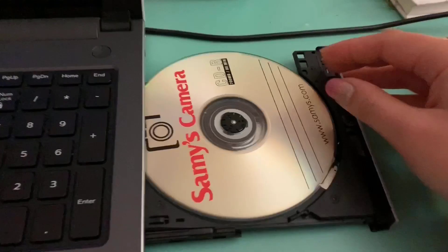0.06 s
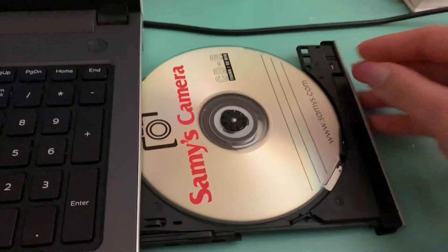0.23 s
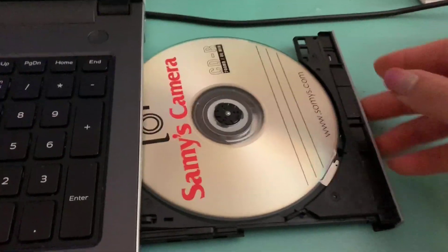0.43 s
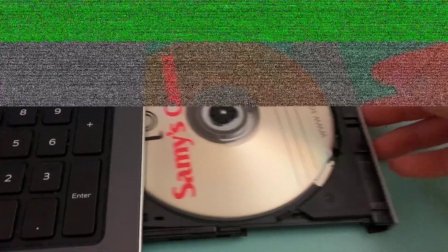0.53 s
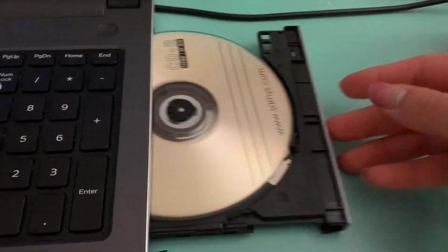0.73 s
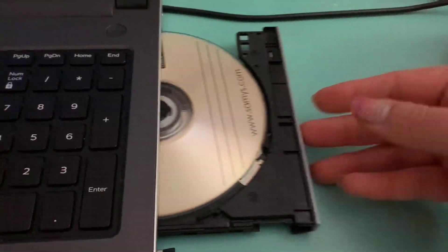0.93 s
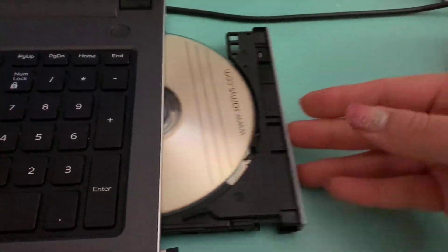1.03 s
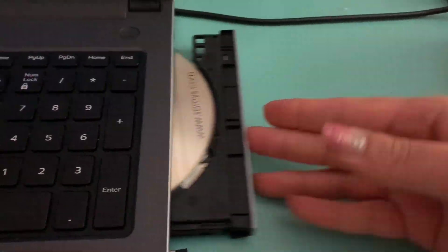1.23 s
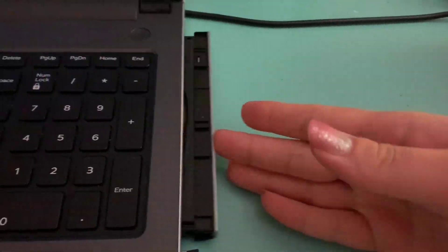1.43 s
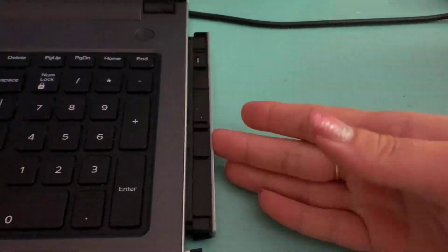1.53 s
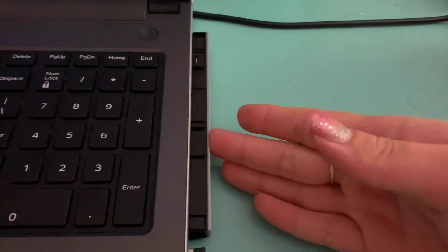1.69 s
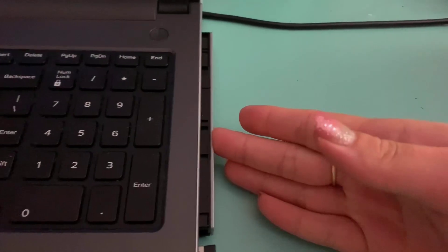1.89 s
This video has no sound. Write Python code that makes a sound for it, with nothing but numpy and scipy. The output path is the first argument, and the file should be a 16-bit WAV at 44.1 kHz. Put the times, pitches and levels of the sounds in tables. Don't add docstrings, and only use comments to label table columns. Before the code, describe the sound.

A laptop disc tray closes, heard close in stereo in a quiet, dry room. Faint skin brushing and dull handling open it; the disc snaps at 0.29 s, with low bumps until 0.55. Gritty, hissing plastic sliding runs from about 0.55 to 1.4 s, with tiny ticks near 0.67, 0.72 and 0.94, brief squeaks, and the loudest click at 1.12. A softer latch at 1.46 leaves faint rumble and fan.

```python
import sys
import numpy as np
from scipy import signal
from scipy.fft import rfft, irfft, next_fast_len
from scipy.io import wavfile
from scipy.ndimage import uniform_filter1d

SR = 44100
rng = np.random.default_rng(int(sys.argv[2]) if len(sys.argv) > 2 else 0)


def transcribe(signal):
    frames = np.atleast_2d(signal).T
    limited = np.clip(frames, -1, 1)
    pcm = np.round(limited * 32767).astype(np.int16)
    wavfile.write(sys.argv[1], SR, pcm)


def linear_from_db(decibels):
    return 10 ** (np.asarray(decibels, float) / 20)


N = 85995


def evened(x):
    return x / np.sqrt(np.mean(x ** 2) + 1e-20)


def noise():
    return rng.standard_normal(N)


def read(points, hz):
    f, value = np.transpose(points)
    return np.interp(np.log(hz + 1), np.log(f + 1), value)


def along(rows, column=1):
    rows = np.array(rows)
    return np.interp(np.arange(N) / SR, rows[:, 0], rows[:, column])


def coloured(x, points):
    hz = np.fft.rfftfreq(len(x), 1 / SR)
    return evened(irfft(rfft(x) * linear_from_db(read(points, hz)), len(x)))


def ring(x, peaks):
    out = np.zeros(len(x))
    for hz, width, db in peaks:
        r = np.exp(-np.pi * np.clip(width, 5, 3000) / SR)
        poles = [1, -2 * r * np.cos(2 * np.pi * hz / SR), r * r]
        out = out + linear_from_db(db) * (1 - r) * signal.lfilter([1, 0, -1], poles, x)
    return out


def grains(per_s, spread_db):
    size = linear_from_db(spread_db * np.minimum(rng.exponential(1, N), 5))
    struck = rng.random(N) < per_s / SR
    return evened(size * noise() * struck)


def flutter(size):
    return evened(uniform_filter1d(uniform_filter1d(noise(), size), size))


# t/s, rub level/dB, dullness/dB
SLIDE = [(0.0, -83.5, 20.5), (.055, -88, 1.5), (.17, -78, 4.5), (.215, -74, 5), (.28, -69, 12),
         (.295, -51, -7.5), (.44, -66, 6.5), (.468, -74.5, 9.5), (.54, -53, -14.5), (.7, -44, -10),
         (1.0, -53.5, -0.5), (1.065, -46, -7), (1.2, -49.5, -7), (1.38, -56.5, 0.5), (1.44, -73, 6),
         (1.58, -83, 3), (1.7, -69, 7.5), (1.81, -84.5, 12)]
# t/s, peak level/dB, decay length/s
JOLTS = [(0.2, -69, 0.021), (0.336, -44.5, 0.023), (0.561, -44, 0.016), (0.668, -34, 0.009),
         (0.717, -42, 0.011), (0.931, -41, 0.0083), (1.064, -46, 0.077), (1.138, -36, 0.015),
         (1.259, -42, 0.067), (1.43, -49.5, 0.014), (1.453, -53.5, 0.029), (0.424, -55, 0.005),
         (0.483, -55, 0.045)]
# f/Hz, density/dB
HISS = [(1600, -7.5), (3100, 1.5), (5200, -7.5), (7000, -2), (8600, -5), (11000, -4), (14000, -10),
        (15800, -15.5)]
# f/Hz, width/Hz, level/dB
TRAY = [(2230, 460, 8), (2870, 68, 8.5), (4050, 300, -1.5), (4640, 210, 8), (6400, 34, 0), (7340, 510, -6),
        (9200, 41, -9), (9570, 240, 2), (12000, 50, -34), (12150, 33, -19)]
# f/Hz, width/Hz, level/dB
SHELL = [(756, 76, -12.5), (886, 130, 8), (1150, 420, 8), (1330, 27, 2), (1510, 41, -13),
         (1950, 100, -26.5)]


def slide():
    t, steady = np.arange(N) / SR, linear_from_db(along(SLIDE))
    level = steady
    for start_s, db, length_s in JOLTS:
        u = np.maximum(t - start_s, 0)
        level = level + linear_from_db(db - 8.0) * np.minimum(u / 0.0018, 1) * np.exp(-u / length_s)
    wobble = linear_from_db(1.5 * flutter(size=500))
    soft = wobble * (0.4 * level + 0.6 * steady)
    grit = grains(per_s=9000, spread_db=2.0) + 0.78 * noise()
    bright = coloured(grit, HISS) + linear_from_db(-10) * evened(ring(grit, TRAY))
    bright = evened(patchy(bright))
    wash = coloured(grit, [(300, -38), (600, -13.0), (1800, -10.5), (3000, -18.5), (16000, -77)])
    dull = evened(evened(ring(grit, SHELL)) + linear_from_db(15.5) * wash)
    return wobble * level * linear_from_db(2.5) * bright + soft * linear_from_db(-4 + along(SLIDE, column=2)) * dull


# t/s, treble lift/(dB per octave)
SHEEN = [(0.0, 6.5), (.25, -0.5), (.45, -2.5), (.7, 3.5), (.95, -0.5), (1.05, -0.5), (1.3, -1), (1.5, -5),
         (1.95, 6)]


def patchy(x):
    hz, t, z = signal.stft(x, SR, nperseg=512)
    patches = uniform_filter1d(rng.standard_normal(z.shape), size=8, axis=0)
    patches = evened(uniform_filter1d(patches, size=10, axis=1))
    octaves = np.log2(np.clip(hz, 1500, 16000) / 5000)[:, None]
    lift = np.interp(t, *np.transpose(SHEEN)) * octaves
    return signal.istft(z * linear_from_db(3.0 * patches + lift), SR, nperseg=512)[1][:N]


# t/s, level/dB
PRESS = [(0.0, -64), (.07, -76.5), (.165, -67.5), (.195, -47), (.23, -57.5), (.26, -50), (.34, -49.5),
         (.39, -50.5), (.432, -40), (.455, -59), (.48, -52.5), (.54, -50.5), (.57, -65.5), (.92, -60.5),
         (1.03, -66), (1.07, -53), (1.23, -58.5), (1.27, -52.5), (1.315, -47.5), (1.35, -61.5),
         (1.75, -65.5), (1.95, -77)]
# f/Hz, width/Hz, level/dB
DESK = [(244, 32, 9.5), (295, 53, 5.5), (343, 36, 5), (440.6, 54, 6.5), (460, 33, -17), (894, 36, -4.5),
        (1370, 120, -11)]


def press():
    slips = grains(per_s=4000, spread_db=1.5) * linear_from_db(1.2 * flutter(size=500))
    modes = ring(ring(slips, DESK), [(318.0, 163, 2), (900, 95, -3.5), (1398, 44, 2.5)])
    return linear_from_db(-1.5 + along(PRESS)) * evened(modes)


# t/s, peak level/dB, chatter length/s, body level/dB
CATCHES = [
    (.2874, -24, .0017, -26),
    (1.1155, -17.5, .0018, -12),
    (1.4578, -28, .0034, -22),
]
# f/Hz, level/dB, t60/s
SNAP = [(2300, -14, .012), (3973, -12, .010), (6700, 0, .016), (9254, -5, .012), (12050, -9, .012),
        (15200, -9, .012)]
# f/Hz, level/dB, t60/s
RAIL = [(2400, 0, .014), (3700, -4, .014), (4900, -1, .014), (7300, 0, .015), (9792, -3, .014),
        (11500, -5, .014), (14500, -18, .012)]
# f/Hz, level/dB, t60/s
LATCH = [(1450, -4, .012), (2300, 3, .012), (2750, 7, .016), (3260, 5, .016), (5030, 0, .016),
         (6400, -2, .014), (10300, -3, .012), (11900, -7, .012), (14400, -17, .01)]
# t/s, peak level/dB, chatter length/s
TICKS = [(.9385, -37, .001), (.9418, -31.5, .0012), (.947, -41, .0015), (.6675, -34, .002),
         (.7205, -35, .0008), (.5398, -43, .002), (1.2432, -41, .002), (.435, -50, .002)]
# f/Hz, level/dB, t60/s
BURR = [(4200, -3, 0.0088), (7940, 7, 0.022), (10500, -5, 0.011), (12200, 0, .008), (14900, -11, .008)]


def catches():
    out = sum(strike(*row, modes) for row, modes in zip(CATCHES, (SNAP, RAIL, LATCH)))
    return out + sum(strike(*row, -24, BURR) for row in TICKS)


# f/Hz, level/dB, t60/s
BODY = [(728, -2.5, 0.087), (1315, 9, 0.009), (1900, -13, 0.018)]


def strike(start_s, db, length_s, body_db, modes):
    t = np.arange(N) / SR - start_s
    u = np.clip(t, 0, .2)
    hits = noise() * np.minimum(u / .001, 1) ** 2 * np.exp(-u / length_s)
    spread = rfft(hits)
    flat = spread / np.sqrt(uniform_filter1d(abs(spread) ** 2, size=1500) + 1e-12)
    hits = irfft(flat, N) * (t > 0)
    top = evened(ring(hits, damped(modes))) + linear_from_db(-11) * evened(np.diff(hits, prepend=0))
    body = ring(uniform_filter1d(hits, size=5), damped(BODY))
    return linear_from_db(db + 2) * (top / abs(top).max() + linear_from_db(body_db - 3) * body / abs(body).max())


def damped(modes):
    return [(hz, 1.73 / t60 * 5.0, db + 20 * np.log10(t60 / .02)) for hz, db, t60 in modes]


# t/s, level/dB, length/s, f/Hz, width/Hz
SQUEAKS = [(.556, -42, 0.0084, 2850, 72), (0.7, -53.5, 0.068, 4700, 110), (1.4, -62, .012, 5100, 150),
           (1.1, -50.5, 0.031, 970, 160), (0.318, -53, 0.029, 1390, 43), (.415, -51.5, 0.024, 455, 29),
           (.33, -57.5, 0.018, 880, 98), (.24, -61, 0.023, 1400, 250), (1.462, -54, 0.026, 2640, 410),
           (1, -75, 0.036, 4700, 400), (1.3, -55.5, 0.011, 7100, 340), (1.21, -56.5, 0.023, 860, 69),
           (1.3, -55, .03, 2500, 250), (.85, -68.5, 0.017, 4600, 200), (2, -70, .04, 2700, 220),
           (1.425, -57, 0.015, 2300, 230),
           (-.01, -71, .022, 5100, 700),
    (-.01, -67, .018, 1400, 400),
    (.18, -70, .035, 5500, 900),
]


def squeaks():
    t, out = np.arange(N) / SR, np.zeros(N)
    for start_s, db, length_s, hz, width_hz in SQUEAKS:
        u = np.maximum(t - start_s, 0) / length_s
        swell = u * np.exp(1 - u * u)
        out = out + linear_from_db(db) * swell * evened(ring(noise(), [(hz, width_hz, 0)]))
    return out


def room(x):
    t = np.arange(SR // 4) / SR
    tail = uniform_filter1d(rng.standard_normal(len(t)), size=2)
    tail = tail * linear_from_db(-60 * t / .15) * (t > .004)
    return signal.fftconvolve(x, tail / np.linalg.norm(tail))[:N]


# t/s, level/dB
RUMBLE = [(0.0, -55), (0.036, -50), (0.06, -68.5), (0.216, -50.5), (0.488, -58), (0.51, -52.5),
          (1.704, -51), (1.742, -55.5), (1.928, -55), (1.95, -55)]
# f/Hz, density/dB
LOW = [(12, -74), (30, -15.5), (75, 1.5), (109, -6.5), (166, -10.5), (193, -17.5), (289, -31), (400, -28),
       (520, -96), (880, -120)]
# f/Hz, density/dB
FLOOR = [(200, 25), (600, -12), (950, -5.5), (1600, -29), (2600, -17), (4700, -15), (9000, -33),
         (16000, -8)]


def rumble():
    low = coloured(noise(), [(1, -86.5), *LOW, (900, -64)])
    hiss = coloured(noise(), [(80, -69), *FLOOR])
    return linear_from_db(along(RUMBLE)) * (linear_from_db(-1) * low + linear_from_db(-19.5) * hiss)


# f/Hz, width/Hz, level/dB
FAN = [(902, 74, 1.5), (1213, 110, -10.5)]


def fan():
    gate = np.clip((np.arange(N) / SR - .07) / 0.11, .1, 1)
    murmur = evened(ring(ring(noise(), FAN), [(1030, 650, 0)]))
    return linear_from_db(-73.5 + 1.1 * flutter(size=900)) * gate * murmur


def bed(clicks):
    rub = slide() + press() + squeaks()
    return rub + linear_from_db(-13) * room(rub + clicks) + rumble() + fan()


# f/Hz, phase/rad
PORT_TURN = [(0, 0), (1100, -.2), (1750, -2.6), (3100, -3.5), (4500, -6.0), (5200, -5.2), (5900, -6.35),
             (16500, 7.25)]
# f/Hz, coherence/1
PORT_SAME = [(60, 0.93), (430, 0.9), (700, 0.45), (1500, 0.6), (2500, 0.68), (3600, .55), (5200, 0.4),
             (7000, 0.9), (8300, .99)]
# f/Hz, level/dB
PORT_LEFT = [(60, 1.3), (430, 1.5), (620, 7), (900, 5), (1400, 3), (2400, 0), (5200, -3), (7500, -.5),
             (9000, 0)]


def ports(x, twin, top_hz):
    size = next_fast_len(N + 4096)
    hz = np.fft.rfftfreq(size, 1 / SR)
    same = np.clip(read(PORT_SAME, hz), 0, 1)
    turn = np.exp(1j * np.interp(hz, *np.transpose(PORT_TURN)))
    left = linear_from_db(read(PORT_LEFT, hz) / 2)
    shared = np.sqrt((1 + same) / 2) * rfft(x, size)
    unlike = np.sqrt((1 - same) / 2) * rfft(twin, size)
    top = linear_from_db(-150 * np.maximum(hz - top_hz, 0) / 1000)
    pair = np.array([left * (shared + unlike), turn / left * (shared - unlike)])
    return irfft(pair * top, size)[:, :N]


def scene():
    clicks = catches()
    scatter = rng.standard_normal(400) * np.exp(-np.arange(400) / SR / .001)
    strewn = signal.oaconvolve(clicks, scatter / np.linalg.norm(scatter))[:N]
    return ports(bed(clicks), bed(clicks), top_hz=15600) + ports(clicks, strewn, top_hz=16350)


def roll_off(x):
    return signal.sosfilt(signal.butter(12, 16550, fs=SR, output="sos"), x)


def record(dry):
    return roll_off(dry)


dry = scene()
out = record(dry)
transcribe(out)
```